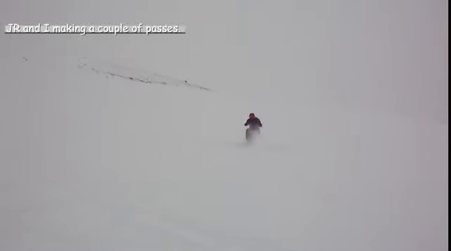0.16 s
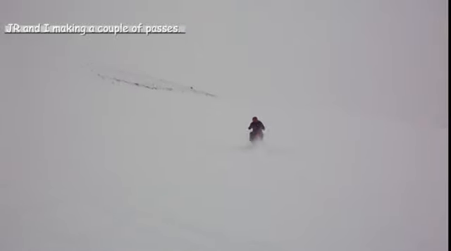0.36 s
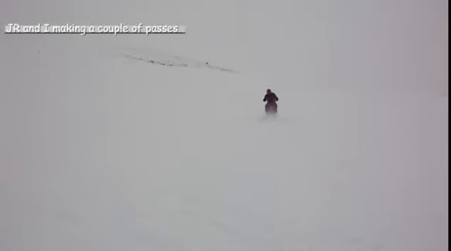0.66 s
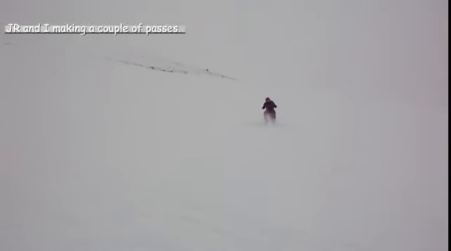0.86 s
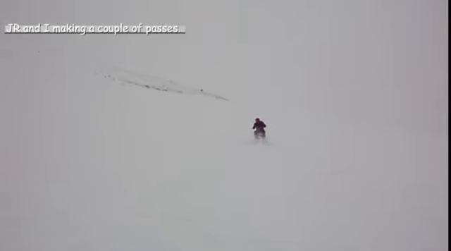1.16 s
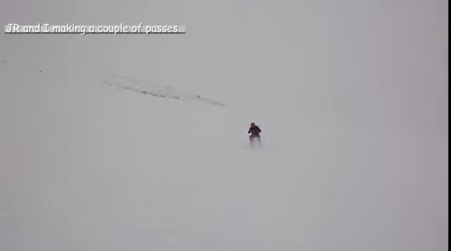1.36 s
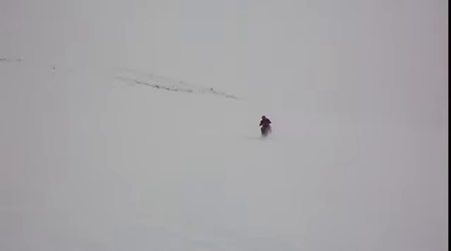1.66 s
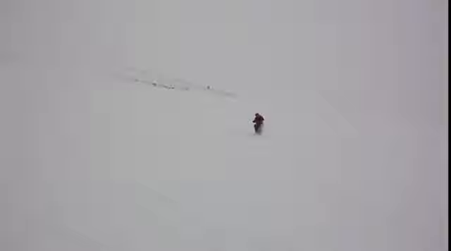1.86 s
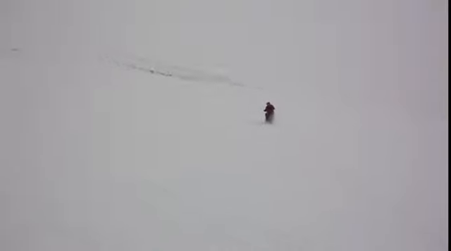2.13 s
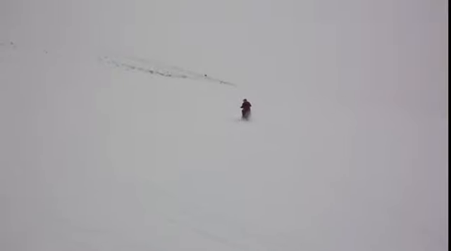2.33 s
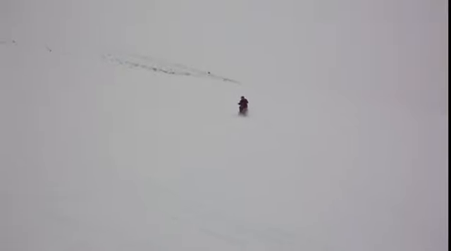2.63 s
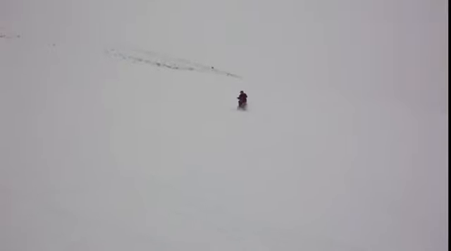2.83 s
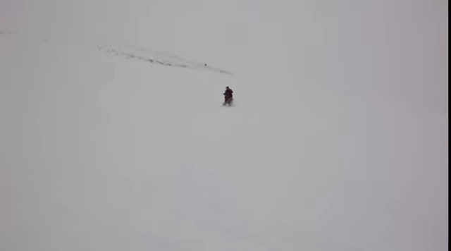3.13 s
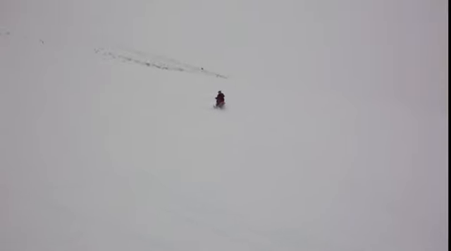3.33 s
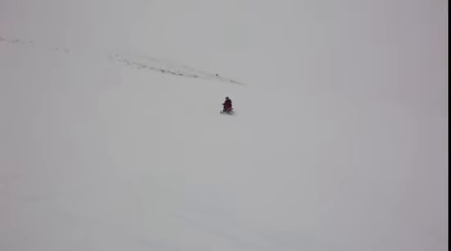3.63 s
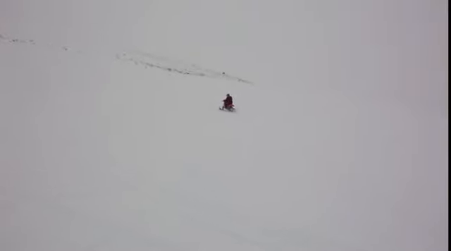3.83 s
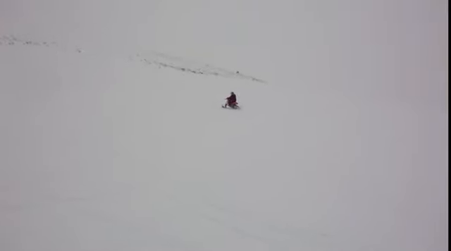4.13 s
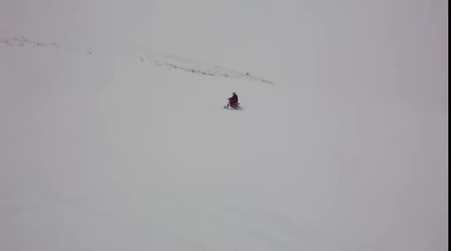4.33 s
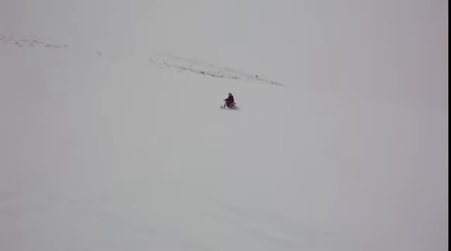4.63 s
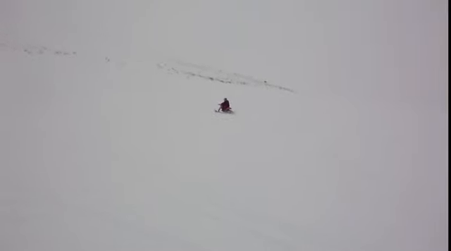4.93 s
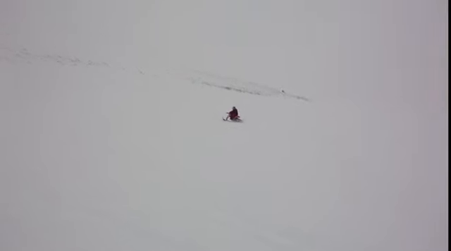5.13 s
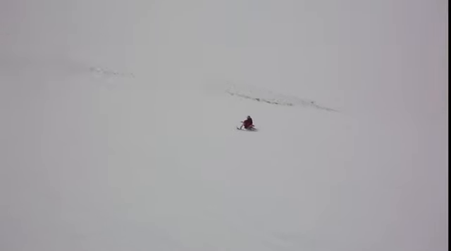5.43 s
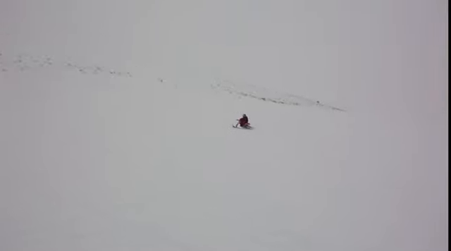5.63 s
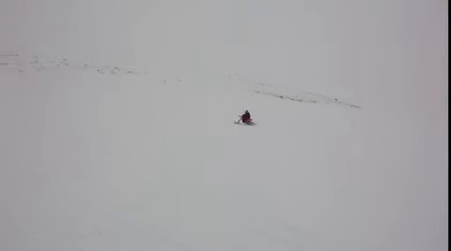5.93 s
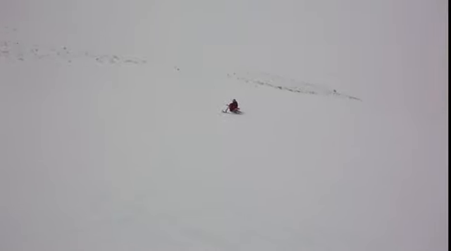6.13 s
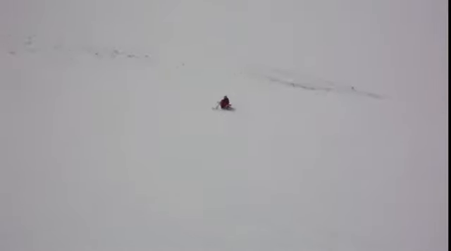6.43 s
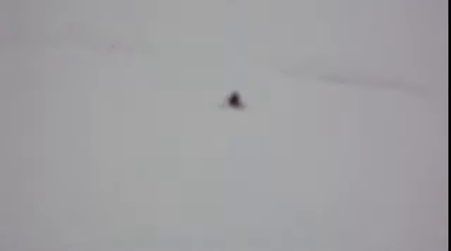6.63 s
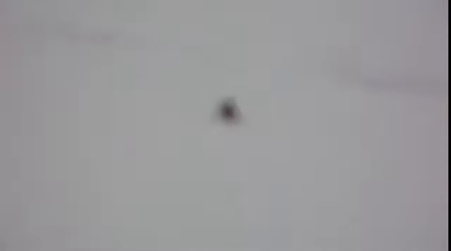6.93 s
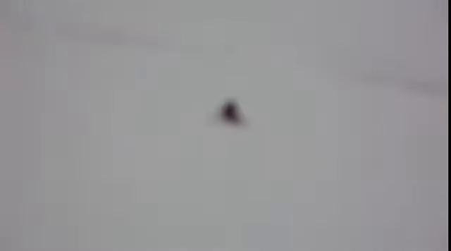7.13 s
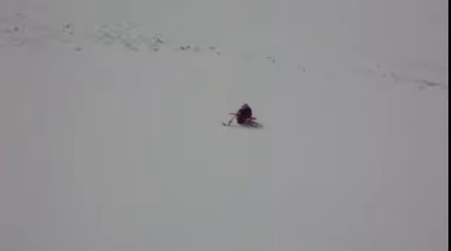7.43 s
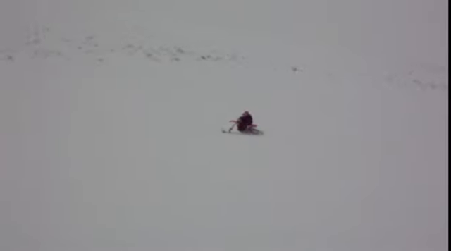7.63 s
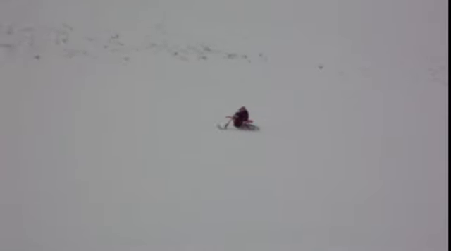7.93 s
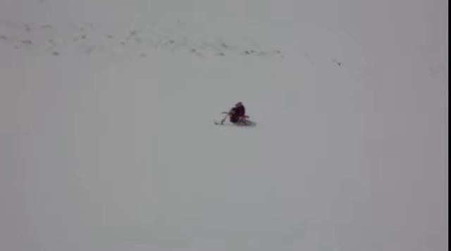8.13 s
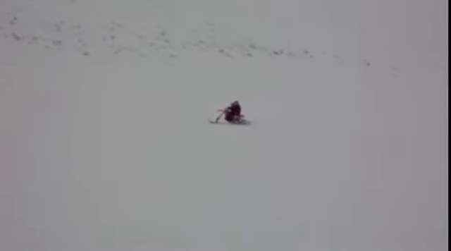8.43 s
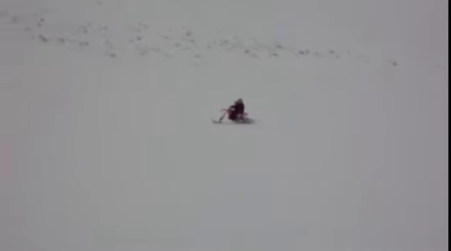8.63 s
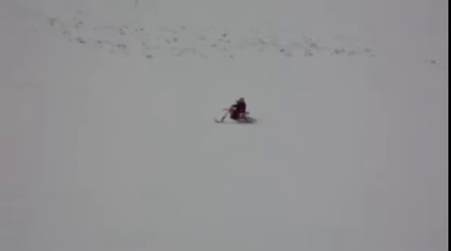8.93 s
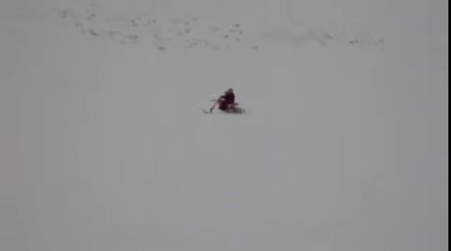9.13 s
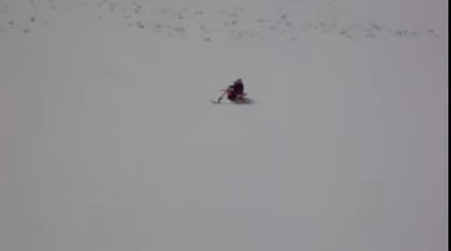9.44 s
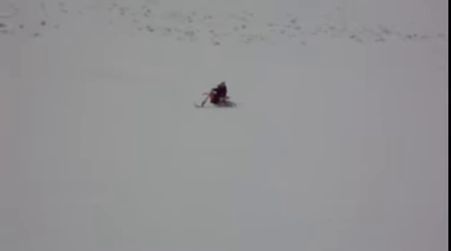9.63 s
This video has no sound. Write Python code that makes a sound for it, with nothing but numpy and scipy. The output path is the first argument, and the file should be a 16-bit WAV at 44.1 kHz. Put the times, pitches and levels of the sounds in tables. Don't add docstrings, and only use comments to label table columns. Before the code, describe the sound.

Outdoors on open snow, heard through a small handheld microphone with low, lumpy wind rumble and light hiss. From 0 to 1.4 s a distant two-stroke bike stutters in raspy, uneven pops, then pulls into a brief buzz around 1.6-2 s. It sputters more quietly until 3.5 s, surges brightly at about 4-4.5 s, then holds a wavering nasal drone with soft snow churn. Faint handling thumps and ticks occur throughout. At 6.2 s a click brings a jump in loudness; at 6.35 s a close zoom motor snaps on, whining and rattling like small gears, with a heavy thump near 6.9 s, stopping with clicks by 7.5 s. The engine and hiss are now louder. Fingers rub the casing around 7.7 s as the engine stutters and pulls. A sharp click at 9.1 s drops the level, and the revs climb to the end at 9.8 s.

```python
import sys
import numpy as np
from scipy import signal
from scipy.io import wavfile
from scipy.ndimage import uniform_filter1d

SR = 44100
rng = np.random.default_rng(int(sys.argv[2]) if len(sys.argv) > 2 else 0)


def file_out(sig):
    cols = np.atleast_2d(sig).T
    lim = np.clip(cols, -1, 1)
    pcm = np.round(lim * 32767).astype(np.int16)
    wavfile.write(sys.argv[1], SR, pcm)


def to_linear_factor(level_db):
    exponent = np.asarray(level_db, float) / 20
    return 10 ** exponent


N = 430857
T = np.arange(N) / SR


def evened(x):
    return x / np.sqrt(np.mean(x ** 2) + 1e-20)


def curve(table):
    s, value = np.transpose(table)
    return np.interp(T, s, value)


def coloured(x, points):
    f, db = np.transpose(points)
    hz = np.abs(np.fft.fftfreq(16384, 1 / SR)) + 1
    gain_db = np.interp(np.log(hz), np.log(f), db, db[0] - 20, db[-1] - 20)
    log_gain = np.log(to_linear_factor(gain_db))
    taps = np.fft.ifft(np.exp(np.conj(signal.hilbert(log_gain)))).real[:8192]
    return signal.oaconvolve(x, taps / np.linalg.norm(taps))[:len(x)]


def slow(hz):
    lowpass = signal.butter(2, hz, fs=SR, output="sos")
    return evened(signal.sosfilt(lowpass, rng.standard_normal(N)))


def add(mix, s, sound):
    part = mix[round(s * SR):][:len(sound)]
    part += sound[:len(part)]


def ring(hz, t60, length=0.066):
    t = np.arange(round(length * SR)) / SR
    return to_linear_factor(-60 * t / t60) * (1 - np.exp(-t / 0.00039)) * np.sin(2 * np.pi * hz * t)


def engine():
    # time in seconds, exhaust crack in dB.
    effort = [(0, -40.5), (.67, -46.5), (.8, -40.5), (1.23, -54), (1.43, -49.5), (1.62, -40.5),
              (2.08, -44.5), (2.13, -57), (2.6, -50), (3.86, -47.5), (4.0, -37), (4.24, -34), (4.5, -42),
              (5.1, -40), (7.5, -42), (9.08, -36.5), (9.16, -40.5), (9.77, -38)]
    turns_s = 3.2, 7.0
    # dB above the crack from behind, from the side and climbing, then dB gained per dB of effort.
    layers = [
        (-10.5, -20.5, -20, 0.02),
        (-8.5, -10.5, -9.5, -0.14),
        (-21, -25.5, -15.5, 0.8),
        (-1.5, -6, -.5, -0.4),
    ]
    # delay in seconds, level in dB.
    echoes = [(.0014, -72), (.0031, -35)]
    # pitch in Hz, level in dB per Hz.
    crack_behind = [(820, -32), (1400, -2), (1630, 2), (1790, 0.5), (1920, 2.5), (2080, 0), (2640, 2.5),
                    (3180, -1.5), (3560, 3.5), (3950, -2), (4800, -27), (6240, -22), (10600, -120)]
    crack_side = [(820, -46), (1400, -4.5), (1650, -7.5), (1870, -1), (2230, -5.5), (2640, 3.5),
                  (2970, -5.5), (3280, -1), (3630, -14.5), (3970, -11), (4800, -39), (6240, -28),
                  (10600, -120)]
    crack_climb = [(820, -26.5), (1400, -2), (1640, 3), (1780, 0.5), (2170, 4.5), (2600, -1), (2940, 3.5),
                   (3180, -2.5), (3420, 3.5), (4100, 2.5), (4800, -8), (6240, -45), (10600, -120)]
    # pitch in Hz, level in dB per Hz.
    drone = [(300, -40), (480, -14), (580, -2), (670, 0), (760, -7), (1020, -4), (1150, -25)]
    silencer = [(1000, -7), (1130, 17), (1240, 26.5), (1340, 7.5), (1500, -9.5)]
    sizzle = [(4300, -2), (4800, 11), (5300, 1), (5700, -6.5), (6200, -5.5), (6900, -20), (8000, -6.5),
              (9000, -15.5), (11000, -26.5)]
    track = [(900, -30), (1400, -16), (2200, -12), (3000, -5), (3400, -3), (3900, -4), (4300, -10),
             (4700, -21), (6000, -28)]

    crack_db = curve(effort)
    side, climb = (np.clip((T - s) / 1.67 + .5, 0, 1) for s in turns_s)
    views = 1 - side, side - climb, climb
    drone_db, ring_db, sizzle_db, wash_db = (
        views[0] * behind_db + views[1] * side_db + views[2] * climb_db + slope * (crack_db + 42)
        for behind_db, side_db, climb_db, slope in layers)

    cracks, starved = firings(crack_db)
    echoed = cracks + sum(to_linear_factor(db) * np.roll(cracks, round(s * SR)) for s, db in echoes)
    puff = np.exp(-np.arange(1500) / SR / .009)
    puffs = signal.oaconvolve(cracks, puff / np.linalg.norm(puff))[:N] * rng.standard_normal(N)
    gas = echoed + .8 * scattered(cracks, .006, .45) + .12 * puffs
    colours = crack_behind, crack_side, crack_climb
    crack = sum(share * coloured(gas, colour) for share, colour in zip(views, colours))

    pipe = cracks + .15 * puffs
    tones = to_linear_factor(drone_db - 0.5) * coloured(pipe, drone)
    tones += to_linear_factor(ring_db - 2.5) * coloured(pipe, silencer)
    tones += thrown(cracks)

    churn_db = crack_db + wash_db + 3.0 - uniform_filter1d(starved, 200)
    wash = coloured(to_linear_factor(churn_db) * rng.standard_normal(N) + .3 * puffs, track)
    far = patchy(crack + wash, 1.3)
    return -to_linear_factor(-4.0) * (far + tones + to_linear_factor(sizzle_db) * coloured(gas, sizzle))


def firings(crack_db):
    # time in seconds, crank turns a second.
    crank_speed = [(0, 79), (1.02, 86.5), (1.31, 68), (1.52, 69.5), (1.79, 87.5), (2.03, 89), (2.27, 66),
                   (3.0, 61), (3.86, 68.4), (4.15, 94.5), (4.34, 97), (4.52, 79), (4.95, 84.5),
                   (8.15, 84.5), (8.5, 92), (9.41, 99), (9.55, 112.5), (9.77, 114.4)]
    # middle in seconds, half length in seconds, turns a second gained.
    surges = [(.38, .28, -7), (.8, .08, -1.7), (1.67, .12, 1.7), (2.17, .12, -3.3), (2.66, .36, 9),
              (3.95, .09, -2), (4.66, .18, -3.2), (4.99, .12, 2.2), (5.36, .1, -1.8), (5.6, .12, -2),
              (5.93, .1, 3.3), (6.19, .16, 11), (6.42, .06, -1.6), (6.67, .1, 2), (7.0, .3, -1.2),
              (7.26, .07, -3), (7.4, .08, 1.1), (7.87, .22, -1.3), (8.3, .08, 2), (8.41, .05, -1.2),
              (8.68, .1, -1.5), (8.92, .11, -4), (9.17, .12, 5)]
    # time in seconds, peak in dB.
    pairs = [
        [(.0124, -23), (.0752, -22), (.1386, -24.5), (.2029, -24), (.2678, -23.5), (.3346, -24.5),
         (.392, -28.5), (.4564, -27.5), (.5222, -26.5), (.596, -27.5), (.7033, -23.5), (.7627, -23.5),
         (.8106, -24), (.8589, -24), (.8939, -26), (.9408, -26), (1.0001, -25.5), (1.1074, -26),
         (1.2421, -29.5), (1.3369, -28.5), (1.4157, -30.5)],
        [(2.2353, -30.5), (2.3261, -32), (2.4189, -28), (2.4768, -28.5), (2.5341, -29), (2.6184, -31),
         (2.6594, -29), (2.7432, -31), (2.815, -30), (2.8739, -32), (2.9692, -34), (3.0375, -33.5),
         (3.0874, -33), (3.494, -35), (3.5414, -29.5)],
        [(6.3849, -25.5), (6.4562, -25), (6.567, -26), (6.6388, -26), (6.6862, -31), (6.8304, -26.5),
         (6.8673, -26), (6.9337, -24.5), (6.993, -23), (7.0394, -26.5), (7.0863, -25), (7.1342, -35),
         (7.2794, -48), (7.3392, -40), (7.4096, -38), (7.457, -29), (7.5167, -29.5), (7.5662, -25.5),
         (7.7074, -25), (7.7428, -25), (7.7912, -25), (7.8271, -26), (7.875, -30), (8.4229, -22.5),
         (8.8757, -24.5), (8.9096, -25.5), (8.9546, -24), (9.2275, -28.5), (9.2793, -26)],
    ]
    # time in seconds, peak in dB.
    singles = [(1.0716, -24.5), (1.185, -26.5), (2.0848, -26.5), (2.164, -29.5), (2.591, -28), (2.921, -28),
               (3.3084, -31.5), (3.3552, -31), (3.402, -30), (3.449, -28.5), (6.3502, -24.5), (8.856, -24)]
    # time in seconds, peak in dB (only the times are used).
    steady = [(3.9256, -25), (4.194, -16), (4.461, -24), (5.0604, -22), (5.4393, -22), (5.7159, -21),
              (6.1111, -19)]
    steady_late_s = [6.1963, 6.2936, 8.51, 8.6288, 8.7585, 9.0583]

    speed = curve(crank_speed)
    for s, half, gained in surges:
        speed += gained * np.cos(np.pi / 2 * np.clip((T - s) / half, -1, 1)) ** 2
    listed = [(s, db, 0.5) for s, db in np.vstack(pairs)]
    listed += [(s, db, -8) for s, db in singles]
    listed.sort()
    marks = np.round(np.transpose(listed)[0] * SR).astype(int)
    steady_s = np.r_[np.transpose(steady)[0], steady_late_s]
    beats = np.sort(np.r_[marks, np.round(steady_s * SR).astype(int)])

    turns = np.cumsum(speed * (1 + .002 * slow(30))) / SR
    turns += np.interp(np.arange(N), beats, np.unwrap(-turns[beats] % 1, period=1))
    at = np.flatnonzero(np.diff(np.floor(turns)))
    per_turn = np.sqrt(SR / speed)
    cracks = np.zeros(N)
    cracks[at] = -(to_linear_factor(crack_db) * per_turn)[at] * to_linear_factor(1.1 * rng.standard_normal(len(at)))

    nearest = [np.argmin(abs(at - mark)) for mark in marks]
    starved = np.zeros(N)
    for k in nearest:
        starved[at[max(k - 2, 0)]:at[k]] = 1
    cracks *= to_linear_factor(-7.5 * starved)
    for k, (s, db, next_db) in zip(nearest, listed):
        cracks[at[k:k + 2]] = -to_linear_factor([db + 15.0, db + 14.5 + next_db])
    return cracks, starved


def scattered(x, decay_s, drift_s):
    t = np.arange(1300) / SR
    out = np.zeros(N)
    for k in range(3):
        tail = rng.standard_normal(len(t)) * np.exp(-t / decay_s) * (t > .001)
        share = np.sqrt(2 / 3) * np.cos(np.pi * (T / drift_s + k / 3))
        out += signal.oaconvolve(x * share, tail / np.linalg.norm(tail))[:N]
    return out


def thrown(pipe):
    # start
    # and end in seconds, first and last pitch in Hz, level in dB.
    clear = [(0, .6, 1670, 1610, -16), (0.648, 1.0, 1210, 1220, -9.5), (1.46, 2.096, 610, 700, -17.5),
             (1.62, 2.08, 2440, 2700, -4), (1.68, 1.807, 1610, 1660, -4), (1.75, 2.053, 1840, 1850, -11),
             (1.97, 2.074, 2520, 2470, 3), (2.25, 3.15, 2380, 2530, -9), (2.94, 3.977, 1250, 1210, -8),
             (3.302, 3.962, 2510, 2430, -1), (3.9, 4.197, 1770, 2100, -18), (3.94, 4.42, 3250, 3450, -0.5),
             (4.1, 4.5, 2470, 2370, -16), (3.998, 4.397, 3860, 4080, -7), (4.446, 4.748, 3060, 2860, -2),
             (4.9, 5.6, 2650, 2520, -8), (5.3, 5.75, 3400, 3200, -22), (5.8, 6.358, 1570, 1600, -5.5),
             (7.56, 8.102, 3370, 3250, -5), (8.747, 9.127, 3580, 3640, -11), (4.35, 4.75, 1930, 1780, -13),
             (4.8, 5.188, 1920, 2000, -17), (4.86, 5.1, 1290, 1380, -4.5), (4.998, 5.24, 3470, 3600, -7),
             (5.63, 6.148, 1180, 1360, -10.5), (5.753, 6.05, 2720, 2750, -27),
             (6.397, 7.064, 1460, 1540, -2.5), (7.567, 7.683, 1990, 2110, -5), (7.7, 8.15, 1960, 2110, -33),
             (7.858, 8.12, 3150, 3160, -6), (8.14, 8.448, 1560, 1680, -8), (8.15, 8.397, 2310, 2360, -4.5),
             (8.196, 8.35, 3480, 3650, -2), (8.385, 8.736, 4100, 3840, -10), (8.437, 8.86, 1620, 1680, -14),
             (8.447, 8.856, 2110, 2180, -11), (8.73, 9.117, 2750, 2820, -1.5),
             (8.932, 9.143, 2130, 2200, -2.5), (9.308, 9.758, 2030, 2060, -5.5),
             (9.543, 9.764, 4030, 4280, -21),
             (7.562, 7.848, 3900, 3880, -16),
        (7.855, 8.4, 3920, 4050, -17),
        (8.546, 8.85, 3480, 3660, -6),
        (9.298, 9.77, 3760, 3680, -12),
             (0, .6, 1090, 1040, -8), (.7, 1.1, 1460, 1500, -12), (.7, 1.15, 3180, 3100, -14),
             (2.3, 3.0, 1430, 1410, -16), (2.5, 2.9, 2100, 2100, -7), (.45, .75, 2940, 2700, -2),
             (0.644, 1.1, 820, 820, -14), (1.4, 1.7, 1680, 1700, -16), (1.62, 1.9, 2320, 2300, -7),
             (2.08, 2.4, 2450, 2440, -4), (2.3, 2.7, 3000, 2880, -8), (2.346, 2.797, 3720, 3670, -10),
             (2.55, 3.2, 2330, 2440, -4), (3.2, 3.6, 1770, 1770, -15), (3.28, 3.58, 3840, 3720, -3),
             (3.5, 3.948, 2740, 2670, -9), (3.895, 4.297, 3160, 3130, -2.5), (4.0, 4.35, 4260, 4400, -18),
             (4.4, 4.65, 3470, 3420, -3), (4.4, 5.0, 2720, 2870, -8), (4.55, 5.1, 5200, 5200, -22),
             (5.4, 6.1, 2650, 2600, -10), (5.7, 6.2, 1320, 1300, -14), (5.7, 6.1, 1720, 1770, -11),
             (4.0, 4.397, 1240, 1360, -16), (4.95, 5.55, 4450, 4450, -18), (7.558, 7.897, 2250, 2360, -7),
             (7.75, 8.096, 1440, 1440, -26), (7.9, 8.403, 910, 880, -21), (8.25, 8.95, 4700, 4600, -8),
             (8.45, 9.05, 4330, 4350, -9), (8.4, 9.108, 760, 735, -27), (8.622, 9.2, 3890, 4240, -10.5),
             (8.652, 9.05, 2130, 2330, -9.5), (9.203, 9.772, 760, 800, -23), (9.2, 9.602, 4600, 4500, -14),
             (9.3, 9.77, 1820, 1950, -14), (9.396, 9.77, 1250, 1190, -12.5)]

    out = np.zeros(N)
    r = to_linear_factor(-60 / .011 / SR)
    resonator = np.poly([r, r])
    norm = np.linalg.norm(signal.lfilter([1], resonator, signal.unit_impulse(2000)))
    for start, end, first_hz, last_hz, db in clear:
        part = pipe[round(max(start, 0) * SR):round(end * SR)]
        slide_hz = np.linspace(first_hz, last_hz, len(part))
        turn = np.exp(2j * np.pi * np.cumsum(slide_hz) / SR)
        swell = signal.windows.tukey(len(part), .5)
        rung = signal.lfilter([1], resonator, part * swell / turn + 1e-18)
        add(out, max(start, 0), to_linear_factor(db) * np.sqrt(2) / norm * (turn * rung).real)
    return out


def patchy(x, patchy_db):
    z = signal.stft(x, nperseg=256)[2]
    field = rng.standard_normal(z.T.shape).T
    field = uniform_filter1d(field, 2, 0)
    field = uniform_filter1d(field, 200, 1, mode="wrap")
    return signal.istft(z * to_linear_factor(patchy_db * evened(field)), nperseg=256)[1][:N]


def zoom():
    # time in seconds, level in dB.
    motor = [
        (6.365, -27),
        (6.399, -22.5),
        (6.9, -21.5),
        (7.433, -21.5),
        (7.445, -77),
    ]
    # multiple of the step rate, level in dB.
    hum = [(1, -50), (2, -49), (3, -53), (4, -43), (6, -42), (8, -44), (16, -44), (18, -48), (20, -47),
           (22, -56), (24, -59), (26, -53), (34, -63), (36, -63)]
    # knock in dB, tick in dB.
    teeth = [(-10, -2), (-8, -1), (-8, 0), (-6, 2), (-8, -3), (-8, -8), (-11, -10), (-5, -7), (-3, -5),
             (2, -3), (-3, -4), (2, -1), (-5, -3), (-1, -1), (-6, 0), (-11, -9), (-15, -9), (-17, -12),
             (-17, -10)]
    # time in seconds, peak in dB.
    gear_jolts = [(6.363, -8), (6.398, -13), (6.418, -21), (6.4515, -10), (6.4645, -8), (6.536, -3),
                  (6.5576, -7), (6.901, -16), (6.913, -18), (6.9168, -3.5), (7.2518, -23), (7.3417, -22),
                  (7.3583, -9), (7.427, -12), (7.4378, 3.5)]
    # pitch in Hz, level in dB per Hz.
    knock = [(2400, -37.5), (3200, -6.5), (3550, -2), (3700, -1.5), (3900, 0.5), (4020, 2.5), (4160, 1),
             (4420, -3.5), (5000, -11), (6000, -20.5), (7000, -34)]
    tick = [(4200, -14), (5400, 4), (6100, -0.5), (6900, -6), (7800, -4), (8700, -12), (10400, -31),
            (12000, -43)]
    housing = [(530, -10.5), (900, -16.5), (1210, -4), (1710, -0.5), (1990, -5.5), (2520, 2), (2810, -6.5),
               (4020, 10.5), (4480, 1), (6060, -25), (6760, -19), (7860, -9), (8760, -33), (10300, -19),
               (12000, -61), (15600, -86), (22000, -120)]

    step_hz = 293.0
    s, db = np.transpose(motor)
    level = to_linear_factor(np.interp(T, s, db, -120, -120))
    passed = np.floor(T * step_hz / 10 * len(teeth) - .44).astype(int)
    knock_db, tick_db = np.array(teeth)[passed % len(teeth)].T
    strikes = (np.diff(passed, prepend=0) > 0) * to_linear_factor(3.0 * rng.standard_normal(N))
    knocks = evened(strikes * to_linear_factor(knock_db) * np.sign(rng.standard_normal(N)))
    chatter = np.exp(-np.arange(80) / SR / .00015)
    ticks = evened(signal.oaconvolve(strikes * to_linear_factor(tick_db), chatter)[:N] * rng.standard_normal(N))
    grind_db = -4 + .5 * uniform_filter1d(knock_db * 1., size=150)
    grind = to_linear_factor(grind_db) * rng.standard_normal(N)
    rattle = coloured(knocks, knock) + coloured(0.52 * knocks + grind, housing)
    rattle += to_linear_factor(-15) * coloured(ticks, tick)
    whine = sum(to_linear_factor(d + 25.5) * np.sin(2 * np.pi * (k * step_hz * T + rng.random())) for k, d in hum)

    jolts = np.zeros(N)
    for s, db in gear_jolts:
        add(jolts, s, to_linear_factor(db - 8) * rng.standard_normal(300) * ring(180, .016, 300 / SR) * 3)
    jolted = .5 * coloured(jolts, housing) + 1.1 * coloured(jolts, knock) + 0.4 * coloured(jolts, tick)
    return level * (rattle + whine) + jolted


def handling():
    # time in seconds, peak in dB, pitch in Hz.
    thumps = [(0.563, -30, 39), (0.584, -31, 18), (0.651, -32.5, 36), (0.687, -38, 51), (1.065, -34.5, 11),
              (1.301, -38, 20), (2.069, -37, 40), (2.378, -37, 27), (3.854, -40, 37), (5.57, -39.5, 23),
              (5.71, -35.5, 34), (6.149, -28.5, 50), (6.8842, -18.5, 44), (9.629, -30.5, 45)]
    # time in seconds, peak in
    # dB, pitch in Hz, rise in seconds.
    pops = [
        (2.067, -25, 90, 0.00043),
        (6.194, -10, 83, 0.000013),
        (6.8803, 2.5, 92, 0.00087),
        (7.4377, -12, 4430, .00001),
        (9.1087, -13, 1210, .00001),
    ]
    # start and end in seconds, level in dB.
    brushes = [
        (7.659, 7.883, -29.5),
        (9.625, 9.75, -38),
    ]
    # pitch in Hz, width in Hz, level in dB.
    shell = [(263, 150, 2.5), (600, 400, 9.5), (1150, 320, 13.5)]
    # time in seconds, peak in dB, low ring in Hz, high ring in Hz, high ring in
    # dB above the low one, held to 1 at most.
    clicks = [(1.989, -29, 1070, 1500, -10), (2.0665, -23, 1140, 3000, -6), (3.859, -32, 900, 1170, 4),
              (5.399, -36, 1150, 1400, 0), (5.713, -29, 1280, 3200, 0), (5.859, -38, 1050, 1300, 0),
              (6.129, -41, 1060, 1570, 2), (6.208, -4.5, 1263, 3260, 8), (6.3403, 0, 1450, 3600, 15),
              (7.478, -3, 1180, 4320, 0), (9.108, -5, 1190, 3440, 12.5)]
    # pitch in Hz, level in dB per Hz.
    latch = [(500, -19), (1000, 18), (4000, 15), (7000, 0), (11000, -10.5), (16000, -46)]

    out, snaps = np.zeros((2, N))
    for s, db, hz in thumps:
        add(out, s, to_linear_factor(db + 9.0) * (ring(hz, 0.21, .15) + 0.6 * ring(hz * 3.8, 0.053, .15)))
    t = np.arange(4000) / SR
    for s, db, hz, rise_s in pops:
        rise = 1 - np.exp(-t / max(rise_s, 1e-5))
        add(out, s, -to_linear_factor(db - 60 * t / 0.024) * rise * np.cos(2 * np.pi * hz * t))
    for start, end, db in brushes:
        length = round((end - start) * SR)
        rub = rng.standard_normal(length) * signal.windows.tukey(length, .5)
        rubbed = sum(to_linear_factor(d) * np.convolve(rub, ring(hz, 2.0 / width), "same") for hz, width, d in shell)
        add(out, start, to_linear_factor(db) * evened(rubbed))
    snap = np.exp(-np.arange(300) / SR / 0.00081)
    for s, db, low_hz, high_hz, high_db in clicks:
        high = to_linear_factor(min(high_db, 1)) * ring(high_hz, 0.008)
        add(out, s, to_linear_factor(db - 2) * (ring(low_hz, 0.015) + high))
        add(snaps, s, to_linear_factor(db - 3.5) * rng.standard_normal(300) * snap)
    return out + coloured(snaps, latch)


def wind():
    # time in seconds, wind strength in dB.
    gusts = [(0, -29.5), (.2, -38.5), (1.34, -42.5), (1.52, -57), (2.02, -37.5), (2.6, -46), (3.3, -42),
             (3.62, -52.5), (3.84, -38.5), (4.5, -47.5), (6.1, -37.5), (7.3, -34.5), (7.56, -42),
             (7.86, -30), (8.38, -32.5), (8.5, -42), (9.2, -31.5), (9.6, -41.5)]
    # pitch in Hz, level in dB per Hz.
    rumble_colour = [(10, -6.5), (25, 5.5), (44, -16.5), (52, 6), (57, 5.5), (63, 4), (80, -10.5),
                     (100, -9.5), (130, -36)]
    flutter_colour = [(70, -44.5), (110, 0.5), (165, 7.5), (220, -3), (320, -7.5), (450, -20.5),
                      (600, -34.5)]

    rumble = coloured(rng.standard_normal(N), rumble_colour) * to_linear_factor(2.2 * slow(4.2))
    flutter_db = -17.5 + 2.8 * slow(10.4) + 0.5 * steps_db()
    flutter = coloured(rng.standard_normal(N), flutter_colour) * to_linear_factor(flutter_db)
    return to_linear_factor(curve(gusts)) * (rumble + flutter)


def steps_db():
    # time of the jump in seconds, gain in dB.
    gain = [
        (0, 2),
        (6.194, 13),
        (7.5652, 20),
        (9.111, 11),
    ]
    s, db = np.transpose(gain)
    return db[np.searchsorted(s, T, "right") - 1]


def preamp_hiss():
    # pitch in Hz, level in dB per Hz.
    hiss_colour = [(200, 14), (5000, 4.5), (6800, -0.5), (8000, 2), (9000, 0), (11000, -3), (15000, -5.5),
                   (16000, -14)]
    return to_linear_factor(-58 + steps_db()) * coloured(rng.standard_normal(N), hiss_colour)


def scene():
    return (engine() * to_linear_factor(steps_db()) + wind() + handling() + zoom())[None]


def top_cut(x):
    return signal.sosfilt(signal.butter(12, 16400, fs=SR, output="sos"), x)


def record(dry):
    mix = 1.231 * np.tanh((dry + preamp_hiss()) / 1.26)
    return top_cut(mix)


dry = scene()
out = record(dry)
file_out(out)
```